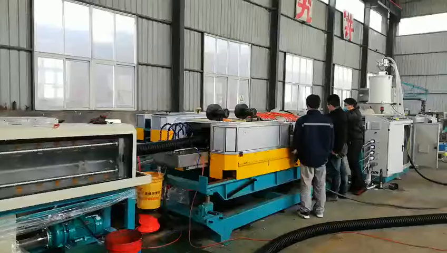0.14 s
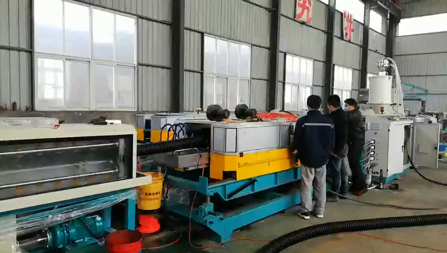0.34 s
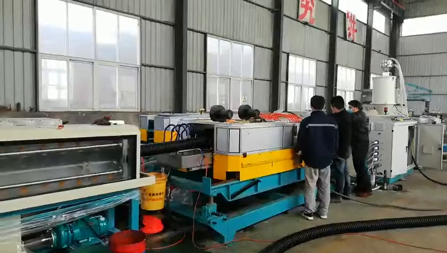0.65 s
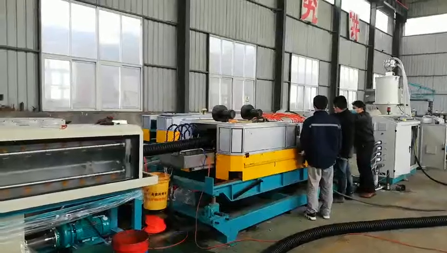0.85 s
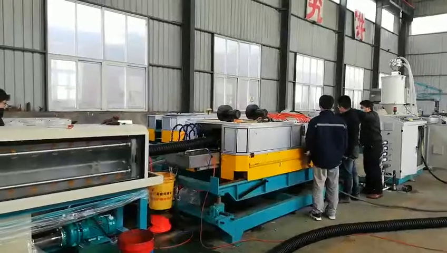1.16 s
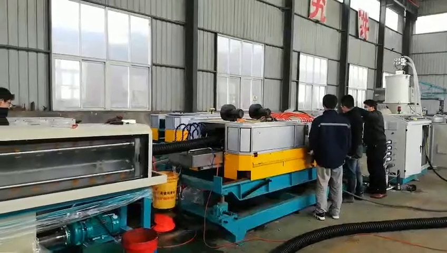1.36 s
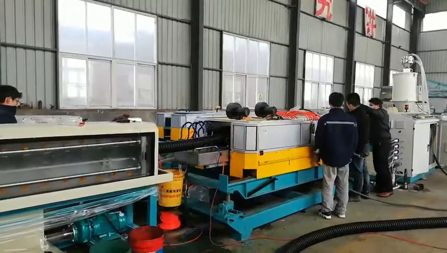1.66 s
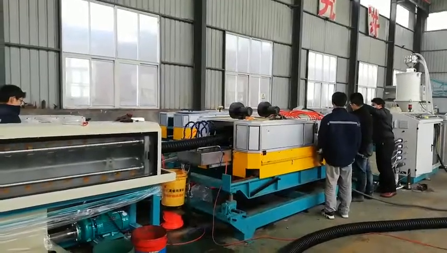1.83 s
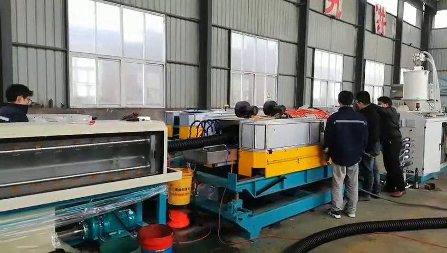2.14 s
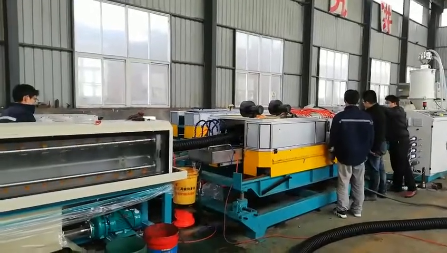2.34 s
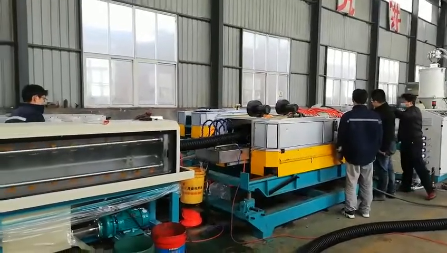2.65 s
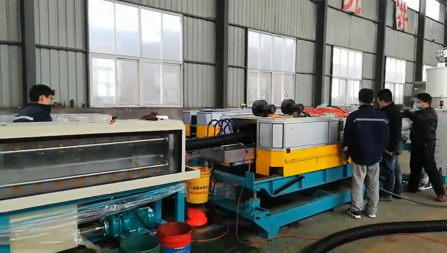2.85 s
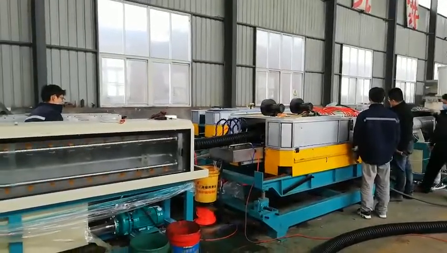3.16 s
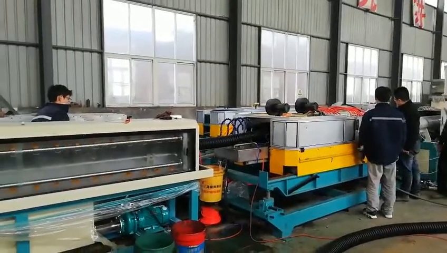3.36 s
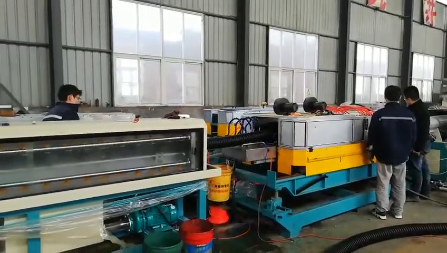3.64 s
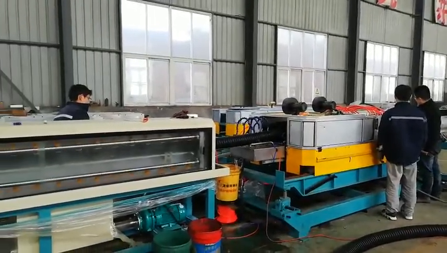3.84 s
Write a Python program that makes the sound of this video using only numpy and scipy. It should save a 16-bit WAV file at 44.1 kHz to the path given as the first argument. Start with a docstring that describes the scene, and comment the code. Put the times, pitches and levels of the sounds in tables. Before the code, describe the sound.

Extrusion machinery drones in a large factory hall. Silence until 0.3 s, then sound cuts in abruptly, swelling slightly until about 0.7 s. A low gear hum throbs about nine times a second over motor rumble, with steady high electric whine and broad fan rush, brighter on the left. A short hiss and tick come at 0.4, faint ticks at 1.5 and 1.7, tiny squeaks around 2.3-2.5, and a softer, longer air hiss at 3.3; the drone continues to the end.

```python
"""A large factory hall, where a pipe extrusion line runs steadily; the sound cuts in and swells briefly.
A gear drive throbs nine times a second as close tones fall in and out of step, over hum and a low motor rumble.
Inverter-fed motors whine in a comb of sine tones, and fans and cooling rush behind them as coloured noise.
Short hisses of air and faint ticks are bursts of noise; faint squeaks are noise in a narrow resonance."""
import sys
import numpy as np
from scipy import signal
from scipy.fft import rfft, irfft
from scipy.io import wavfile

SR = 44100
rng = np.random.default_rng(int(sys.argv[2]) if len(sys.argv) > 2 else 0)


def dump_mix(stems):
    """Bounce the given channels to the path in sys.argv[1] as a 16-bit WAV at rate SR."""
    frames = np.atleast_2d(stems).T  # one column per channel
    limited = np.clip(frames, -1, 1)  # hard clip at full scale
    pcm = np.round(limited * 32767).astype(np.int16)
    wavfile.write(sys.argv[1], SR, pcm)


N = 176400

TIME = np.arange(N) / SR  # seconds
BINS = np.maximum(np.arange(N // 2 + 1) * SR / N, 1)  # frequencies of the spectrum in Hz, at least 1

# level of the whole scene, which cuts in and swells briefly: (time [s], level [dB])
SCENE_LEVEL = [(0.29, -80), (0.299, 0), (0.36, 2.5), (0.43, 3), (0.52, 2), (0.68, 0), (0.85, 0.05), (2, 0),
               (3.2, 0.5), (4, 0.2)]
STOP_FROM_HZ = 16400  # from here up, the sound is at least 70 dB weaker

GEAR_HZ, GEAR_TURNS_PER_S, GEAR_PEAK_S = 115.78, 9.03, 2.524
# distance of each gear tone from the mesh tone: (turn rates [count])
GEAR_STEPS = [-1, 0, 1, 2, 3]
# gear mesh tone and its once-a-turn side tones, before the load: (level [dB])
GEAR_LEVELS = [-40.3, -33.7, -42, -48.5, -49.5]
# how loosely the gear tones keep step, which blurs the throb: (time [s], wander [radians])
GEAR_SLACK = [(0.3, 1.3), (.8, 0.98), (1.4, 0.4), (2, 0.43), (4, 0.43)]
# load on the gear drive, which also sways the hum: (time [s], level [dB])
LOAD = [(0.3, -.5), (0.7, 1.5), (1.15, -2), (2, 0), (2.7, 1), (3.1, -0.5), (3.3, -1), (4, -5)]
# hum of mains, pumps and fans, before the load: (pitch [Hz], level [dB])
HUM = [(100.05, -41), (154.64, -47.5), (222.48, -45), (368.3, -52.5)]

RUMBLE_HZ, RUMBLE_BEATS_PER_S, RUMBLE_PEAK_S = 45.63, 1.98, 2.44
# distance of each motor from the first one: (beat rates [count])
RUMBLE_STEPS = [0, 1]
# two motors turning at nearly the same speed, before the rumble level: (level [dB])
RUMBLE_LEVELS = [-45.5, -51]
# level of the motor rumble: (time [s], level [dB])
RUMBLE_SWELL = [(0.3, -3), (0.9, -2.5), (1.5, -1), (2.45, 4), (3, 2), (3.4, -1), (4, -1.5)]
BEAT_WAVER_DB, BEAT_WAVER_PER_S = 1.1, 2.9  # the beats differ in strength

SWITCH_HZ, SUPPLY_HZ = 2000.05, 32.087
# distance of each whine tone from the switching rate: (supply rates [count])
WHINE_STEPS = [-9, -7, -3, -1, 1, 3, 5, 7, 9, 11, 13, 17, 19, 21, 23, 29, 33]
# inverter whine there, halfway through and before the whine level:
# (left level [dB], right level [dB], change [dB/s])
WHINE = [(-47, -66, 1.5), (-67, -60.5, -7), (-36.5, -47.5, 2.44), (-39.5, -62, -3), (-55.5, -51, 4.5),
         (-39.5, -54.5, -3.5), (-40.5, -49, -0.5), (-52, -65, -1), (-63, -71, -7), (-39.5, -64, 2.2),
         (-44.5, -61, 1.5), (-40.5, -60, 1), (-56, -67, 5), (-65, -70, 7), (-52, -62, 0), (-61, -72, 0),
         (-52, -71, 0)]
# distance of each whine tone from twice the switching rate: (supply rates [count])
OCTAVE_STEPS = [-6, -4, -2, 0, 2, 4, 6, 8]
# inverter whine there, given in the same way: (left level [dB], right level [dB], change [dB/s])
WHINE_OCTAVE = [(-48, -52, 0), (-63, -61, 0), (-67, -60, 0), (-54.5, -49.5, 0), (-60, -65, 0),
                (-57, -64, 0), (-66, -67, 0), (-51, -63, 0)]
# level of the inverter whine: (time [s], level [dB])
WHINE_LEVEL = [(0.3, 1.5), (.55, 1), (.75, 0.5), (2, 0.5), (4, -4)]
# tones of the other motors and gears: (pitch [Hz])
TONES_HZ = [604.9, 737.7, 795.9, 838.9, 907.3, 924.3, 939.5, 988.4, 1209.8, 1512.2, 1652.2, 2046.9, 2239.6,
            2382.6, 2570, 2828, 3024.6, 4860.3, 5840.4, 5942.3, 6001.9, 6061.4, 6180.2, 8624.6, 8912.6,
            9091.9]
# the same tones in each ear: (left level [dB], right level [dB])
TONE_LEVELS = [(-43, -48.5), (-46, -51.5), (-48, -74), (-42, -47), (-43, -48.5), (-49, -47.5), (-45, -54),
               (-50, -58.5), (-50, -68), (-50.5, -59), (-52, -55), (-46, -64), (-51.5, -61), (-47.5, -62),
               (-50.5, -56), (-51, -65), (-55, -64), (-63, -62), (-68, -77), (-58, -57), (-59, -59),
               (-56, -56), (-70, -57), (-61, -77), (-66, -77), (-54, -75)]
# tones shift as the listener moves through the hall's standing waves
WAVER_DB, WAVER_PER_S, PHASE_WANDER_RAD = 1.5, 0.73, 0.28

# rush of fans and cooling, spread through the hall:
# (frequency [Hz], left level [dB per Hz], right level [dB per Hz])
RUSH = [(20, -80, -78), (41.4, -64.5, -64), (75, -66, -65.5), (128, -59, -60), (254, -64, -62),
        (345, -64.5, -63), (514, -68, -69), (636, -67, -67.5), (860, -63, -68), (1116, -68, -71),
        (1390, -71, -77), (2100, -66.5, -88), (2660, -66, -72.5), (2870, -69, -77), (3230, -70.5, -74.5),
        (4260, -73, -76), (5400, -78, -78), (6170, -73.5, -81), (6430, -82, -77), (7430, -78, -82.5),
        (8040, -74.5, -86.5), (9300, -74, -87), (10400, -77, -96), (10800, -81.5, -94), (13500, -83, -100),
        (16000, -90.5, -105)]
# how alike the rush is in both ears: (frequency [Hz], likeness [0-1])
LIKENESS = [(120, 0.97), (260, 0.86), (370, 0.66), (480, 0)]
FLICKER_DB, FLICKER_PER_S = 0.76, 17
# level of the treble rush: (time [s], level [dB])
TREBLE_LEVEL = [(0.3, -0.18), (0.7, -1.5), (1.4, .5), (2.6, -0.68), (3.3, -0.41), (3.85, 2.1), (4, -0.22)]
TREBLE_FROM_HZ = 7000

# hisses of air: (start [s], attack [s], hold [s], time to fall 60 dB [s], left level [dB])
HISSES = [(0.422, 0.0071, .01, .12, -36.5), (3.333, 0.046, .13, 1.0, -33.5)]
# colour of the hisses: (frequency [Hz], relative level [dB per Hz])
HISS_COLOUR = [(200, -6), (600, 5), (1500, 4), (3500, 4), (5000, -1.5), (7500, -11), (14000, -34)]
HISS_ROUGH_DB, HISS_ROUGH_PER_S = 0.7, 120
AIR_AND_TICK_RIGHT_DB = -4  # right ear compared with left

# light ticks: (start [s], left level [dB])
TICKS = [(0.433, -26), (1.548, -30), (1.704, -32)]
# colour of the ticks: (frequency [Hz], relative level [dB per Hz])
TICK_COLOUR = [(1000, -29), (2900, 4), (4500, -9), (9000, -7.5), (14000, -31)]
TICK_T60_S = 0.045  # time to fall 60 dB

# faint squeaks of the moving pipe: (start [s], length before the tail [s], pitch [Hz], left level [dB])
SQUEAKS = [(2.305, .045, 2930, -39), (2.388, .028, 4930, -35), (2.46, .04, 4920, -43)]
SQUEAK_WIDTH_HZ, SQUEAK_T60_S, SQUEAK_RIGHT_DB = 35, 0.15, -10


def from_db(db):
    """Turn decibels into a gain to multiply by."""
    return 10 ** (np.asarray(db) / 20)


def in_time(rows):
    """Read a (time, value) curve at every sample."""
    return np.interp(TIME, *np.transpose(rows))


def per_bin(rows, axis=1):
    """Read one column of a spectrum table at every frequency."""
    rows = np.array(rows)
    return np.interp(np.log(BINS), np.log(rows[:, 0]), rows[:, axis])


def shaped(gain):
    """Make two unrelated noises of one colour, with an average (rms) strength of 1."""
    noise = irfft(rfft(rng.standard_normal((2, N))) * gain, N)
    return noise / noise.std()


def drift(rate):
    """Wander smoothly by chance with a spread of 1; a higher rate wanders faster."""
    step = 100  # samples between chance values
    memory = np.exp(-2 * np.pi * rate * step / SR)
    chance = rng.standard_normal(3 * N // step)
    slow = signal.lfilter([1], [1, -2 * memory, memory * memory], chance)
    slow = slow[N // step:]  # leave out the filter's start
    return np.interp(np.arange(N) / step, np.arange(len(slow)), slow / slow.std())


def tone(hz, db):
    """Make a sine tone that wavers a little in level and phase."""
    phase = 2 * np.pi * (hz * TIME + rng.random()) + PHASE_WANDER_RAD * drift(WAVER_PER_S)
    gain = from_db(db + WAVER_DB * drift(WAVER_PER_S))
    return np.sqrt(2) * gain * np.sin(phase)


def throb(hz, rate, peak_s, steps, levels_db, wander_rad):
    """Add close tones that fall roughly into step once in every beat, each wavering a little."""
    start = 2 * np.pi * rng.random()
    total = np.zeros(N)
    for step, db in zip(steps, levels_db):
        turning = 2 * np.pi * (hz + step * rate) * (TIME - peak_s)
        gain = from_db(db + BEAT_WAVER_DB * drift(BEAT_WAVER_PER_S))
        total += gain * np.cos(turning + start + wander_rad * drift(1))
    return np.sqrt(2) * total


def envelope(start, attack, hold, t60):
    """Rise in a straight line, hold, then die away by 60 dB in every t60 seconds."""
    age = TIME - start
    rise = np.clip(age / attack, 0, 1)
    tail = from_db(-60 * np.maximum(age - attack - hold, 0) / t60)
    return rise * tail


def gear_drive():
    """Throb with the meshing gear teeth: side tones one turn rate apart beat together under the load."""
    gear = throb(GEAR_HZ, GEAR_TURNS_PER_S, GEAR_PEAK_S, GEAR_STEPS, GEAR_LEVELS, in_time(GEAR_SLACK))
    return from_db(in_time(LOAD)) * gear


def machine_hum():
    """Hum with the steady pitches of mains, pumps and fans, swaying with the load."""
    return from_db(in_time(LOAD)) * sum(tone(hz, db) for hz, db in HUM)


def motor_rumble():
    """Rumble with two motors whose nearly equal speeds beat slowly."""
    rumble = throb(RUMBLE_HZ, RUMBLE_BEATS_PER_S, RUMBLE_PEAK_S, RUMBLE_STEPS, RUMBLE_LEVELS, 0.22)
    return from_db(in_time(RUMBLE_SWELL)) * rumble


def inverter_whine():
    """Whine at side tones of the inverter's switching rate and its double, with its own phase in each ear."""
    whine = np.zeros((2, N))
    combs = ((SWITCH_HZ, WHINE_STEPS, WHINE), (2 * SWITCH_HZ, OCTAVE_STEPS, WHINE_OCTAVE))
    for centre, steps, table in combs:
        for step, (left, right, change) in zip(steps, table):
            hz = centre + step * SUPPLY_HZ
            trend = change * (TIME - TIME.mean())
            whine += [tone(hz, db + trend) for db in (left, right)]
    return whine * from_db(in_time(WHINE_LEVEL))


def other_machine_tones():
    """Sing with the pitches of other motors and gears, with their own phase in each ear."""
    return sum(np.array([tone(hz, db) for db in ears]) for hz, ears in zip(TONES_HZ, TONE_LEVELS))


def fan_and_cooling_rush():
    """Rush with broad noise, most alike between the ears in the bass; each octave flickers by itself."""
    mid, side = rfft(rng.standard_normal((2, N)))
    alike = np.clip(per_bin(LIKENESS), 0, 1)
    pair = np.sqrt(1 + alike) * mid + np.sqrt(1 - alike) * side * [[1], [-1]]
    colour = from_db([per_bin(RUSH, axis=1), per_bin(RUSH, axis=2)])
    pair = pair * colour * np.sqrt(SR) / 2  # makes the table true per Hz
    # octaves counted from the treble edge; the lowest one takes in all the deep bass
    octave = np.maximum(np.floor(np.log2(BINS / TREBLE_FROM_HZ)), -7)
    total = np.zeros((2, N))
    for number in np.unique(octave):
        level_db = FLICKER_DB * drift(FLICKER_PER_S)
        if number >= 0:
            level_db = level_db + in_time(TREBLE_LEVEL)
        total += irfft(pair * (octave == number), N) * from_db(level_db)
    return total


def air_hisses():
    """Hiss with rough air noise that dies away in the hall, left of centre."""
    bursts = sum(from_db(db) * envelope(*shape) for *shape, db in HISSES)
    air = shaped(from_db(per_bin(HISS_COLOUR))) * bursts
    roughness = from_db(HISS_ROUGH_DB * drift(HISS_ROUGH_PER_S))
    return air * roughness * from_db([[0], [AIR_AND_TICK_RIGHT_DB]])


def light_ticks():
    """Tick with noise that starts almost at once and dies away quickly, left of centre."""
    bursts = sum(from_db(db) * envelope(start, 0.00089, 0.002, TICK_T60_S) for start, db in TICKS)
    return shaped(from_db(per_bin(TICK_COLOUR))) * bursts * from_db([[0], [AIR_AND_TICK_RIGHT_DB]])


def pipe_squeaks():
    """Squeak with brief friction: noise sounding in one narrow resonance, left of centre."""
    total = np.zeros((2, N))
    for start, length, hz, db in SQUEAKS:
        resonance = 1 / (1 + ((BINS - hz) / SQUEAK_WIDTH_HZ) ** 2)
        burst = envelope(start, length / 2, length / 2, SQUEAK_T60_S)
        total += from_db(db) * burst * shaped(resonance)
    return total * from_db([[0], [SQUEAK_RIGHT_DB]])


def scene():
    """Run the whole line; the gear drive, hum and rumble are alike in both ears."""
    drives = gear_drive() + machine_hum() + motor_rumble()
    whines = inverter_whine() + other_machine_tones()
    return drives + whines + fan_and_cooling_rush() + air_hisses() + light_ticks() + pipe_squeaks()


def record(dry):
    """Cut the sound in from silence, follow the scene level and remove the highest treble."""
    started = TIME > SCENE_LEVEL[0][0]
    live = dry * from_db(in_time(SCENE_LEVEL)) * started
    treble_cut = signal.cheby2(20, 70, STOP_FROM_HZ, fs=SR, output="sos")
    return signal.sosfilt(treble_cut, live)


dry = scene()
out = record(dry)
dump_mix(out)
```